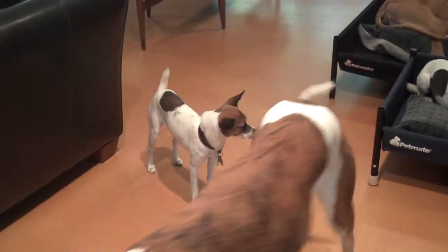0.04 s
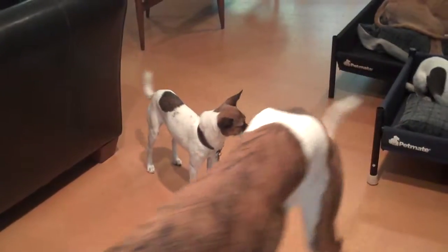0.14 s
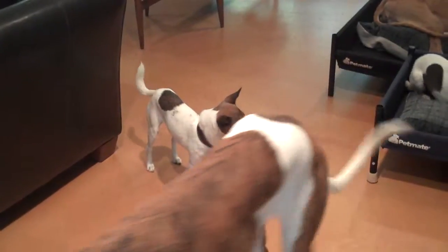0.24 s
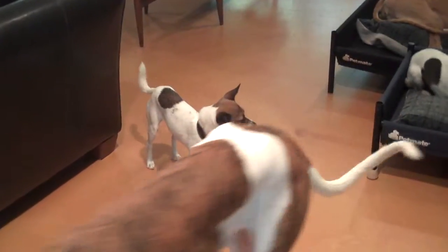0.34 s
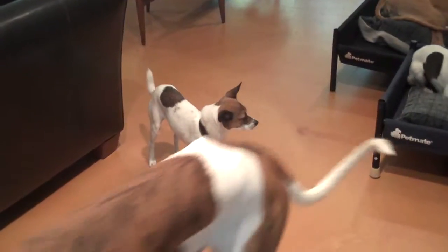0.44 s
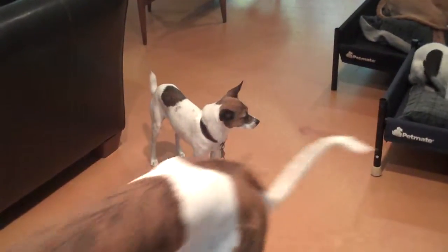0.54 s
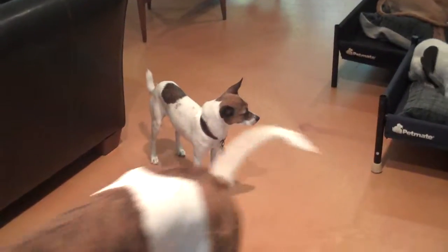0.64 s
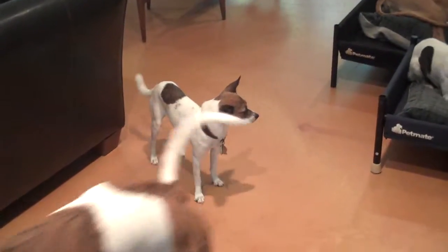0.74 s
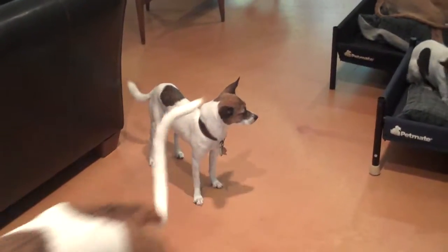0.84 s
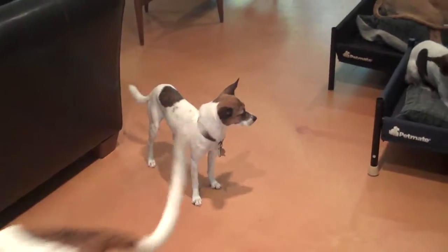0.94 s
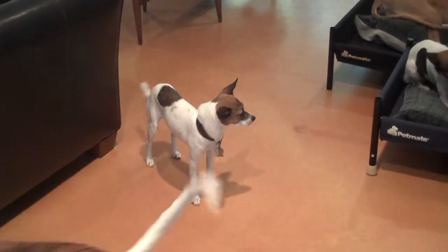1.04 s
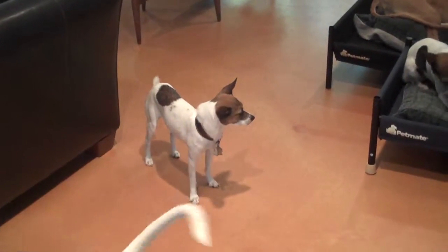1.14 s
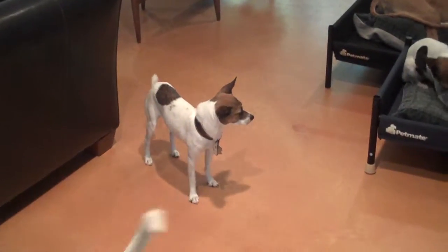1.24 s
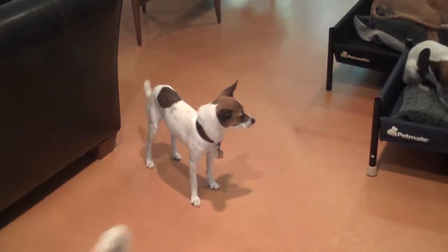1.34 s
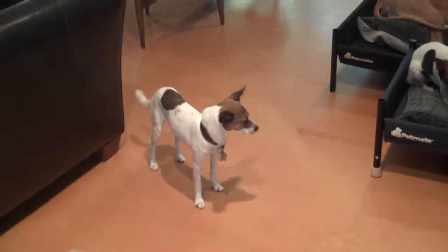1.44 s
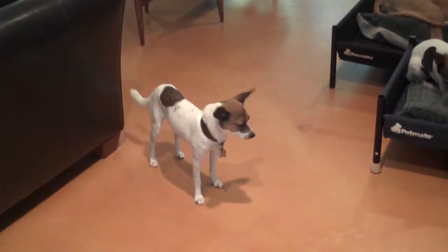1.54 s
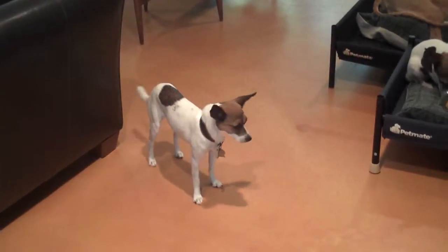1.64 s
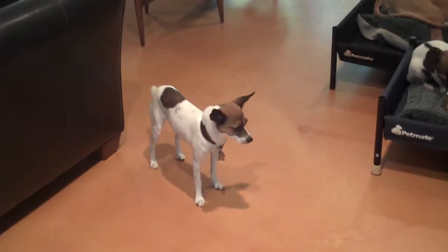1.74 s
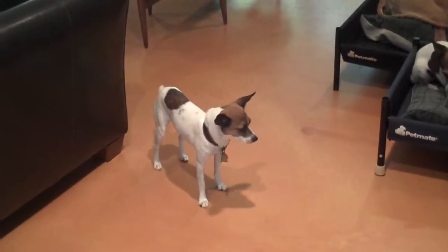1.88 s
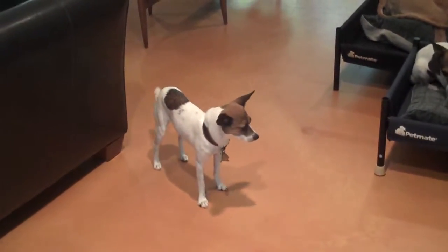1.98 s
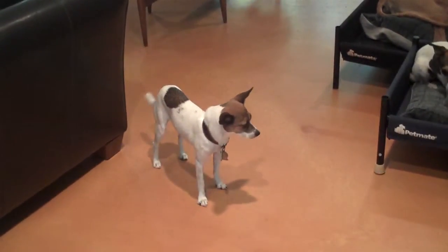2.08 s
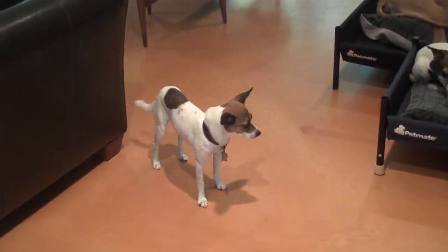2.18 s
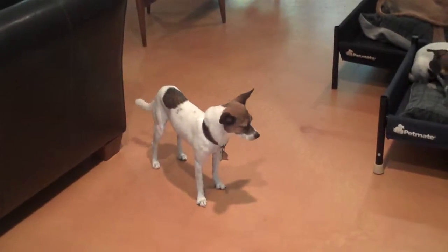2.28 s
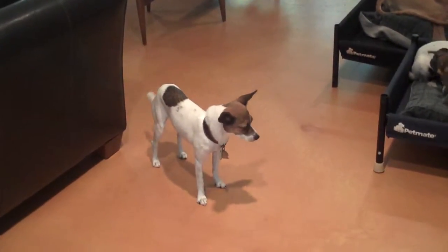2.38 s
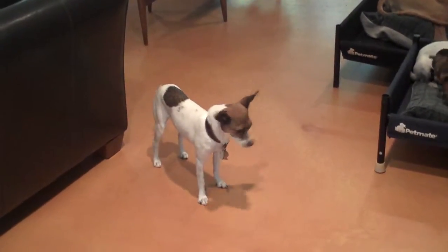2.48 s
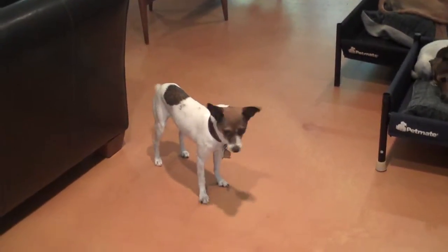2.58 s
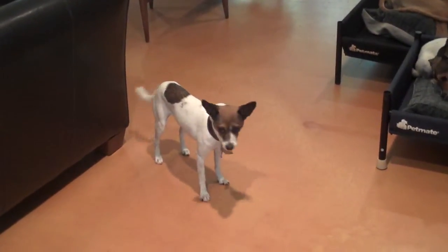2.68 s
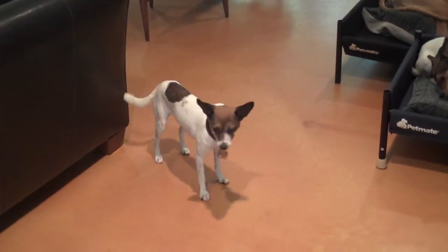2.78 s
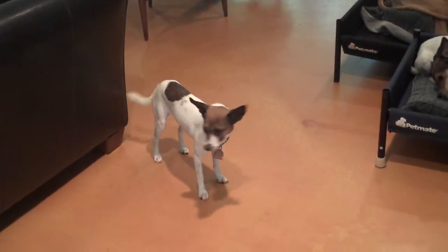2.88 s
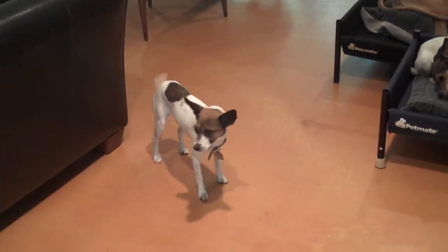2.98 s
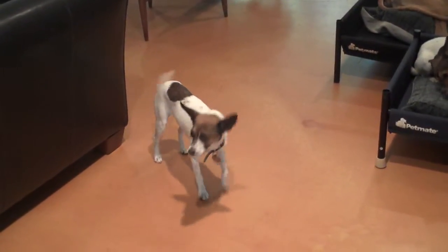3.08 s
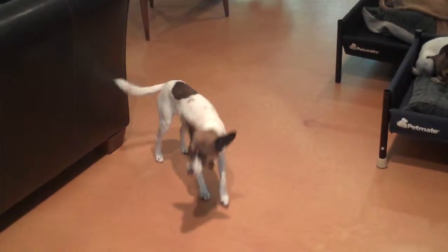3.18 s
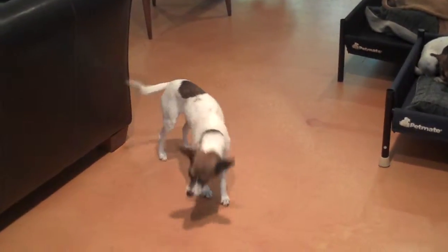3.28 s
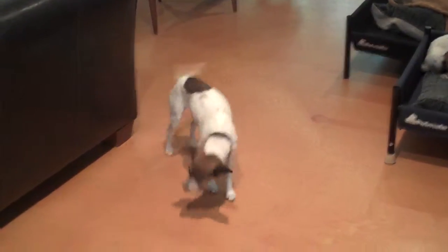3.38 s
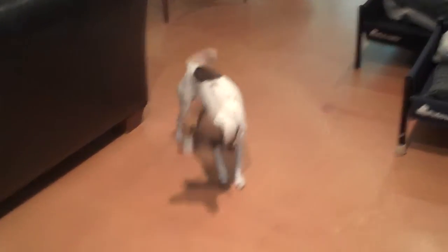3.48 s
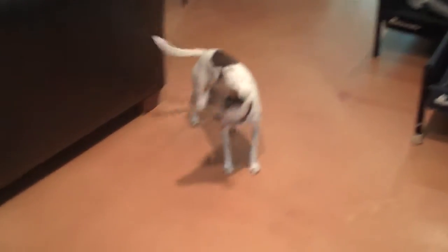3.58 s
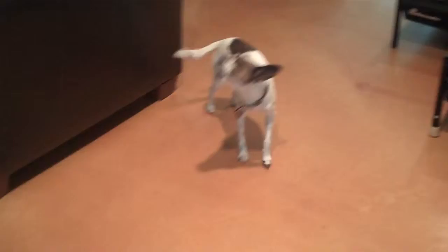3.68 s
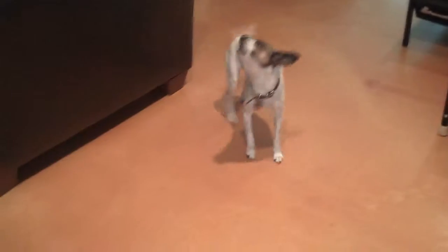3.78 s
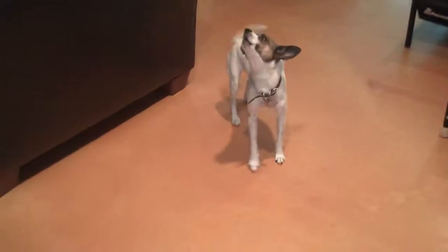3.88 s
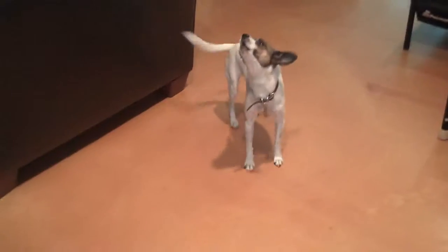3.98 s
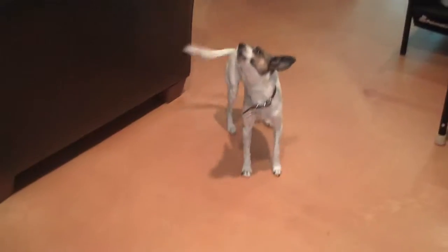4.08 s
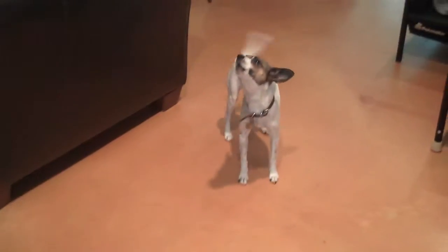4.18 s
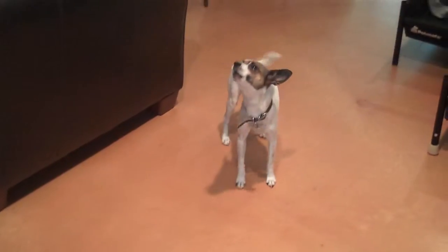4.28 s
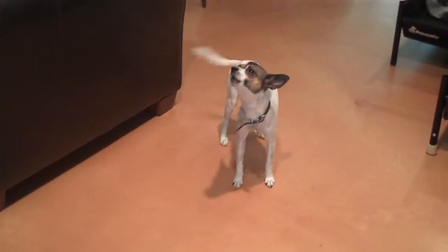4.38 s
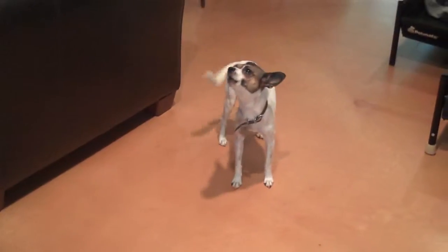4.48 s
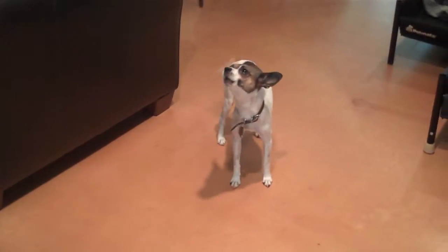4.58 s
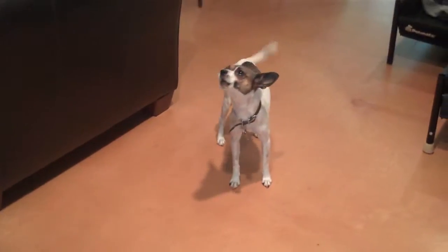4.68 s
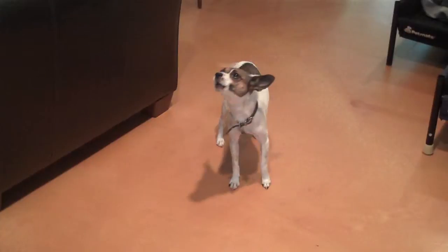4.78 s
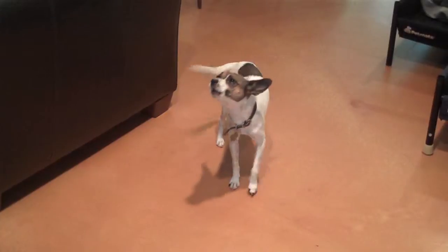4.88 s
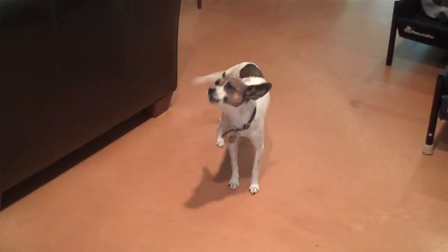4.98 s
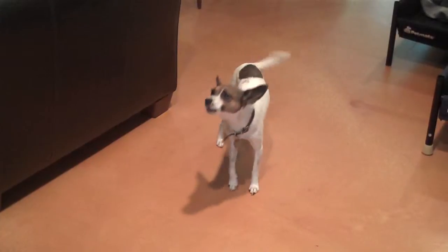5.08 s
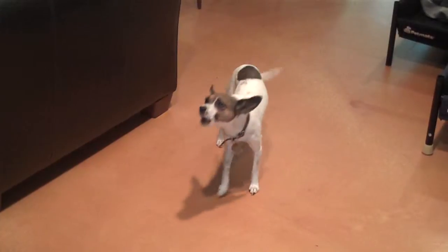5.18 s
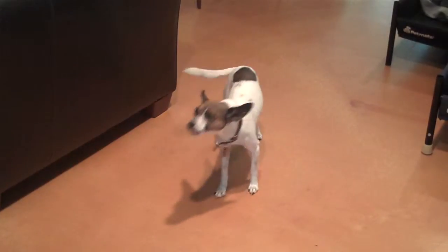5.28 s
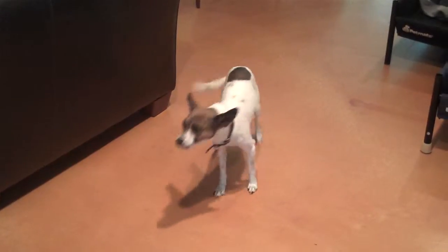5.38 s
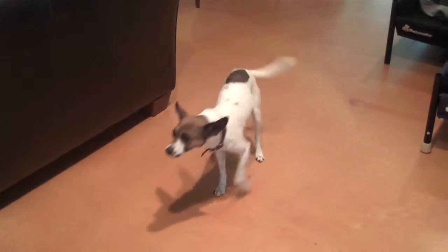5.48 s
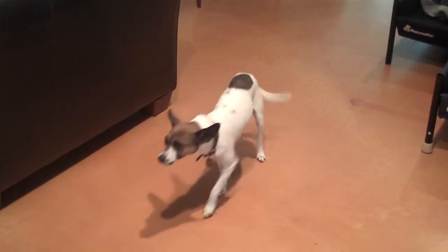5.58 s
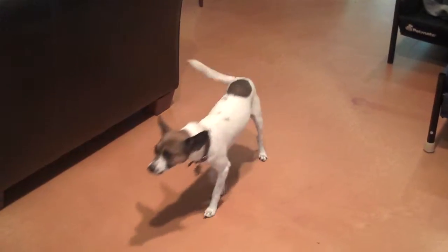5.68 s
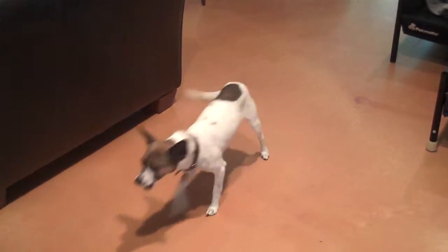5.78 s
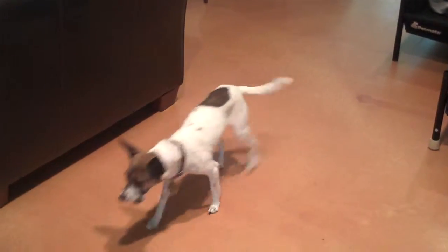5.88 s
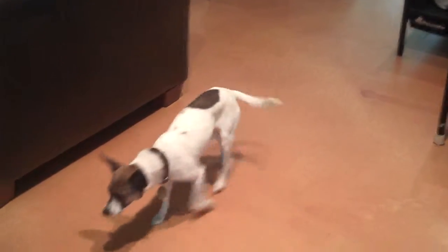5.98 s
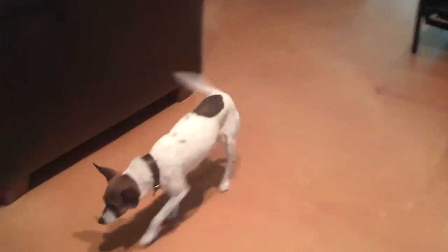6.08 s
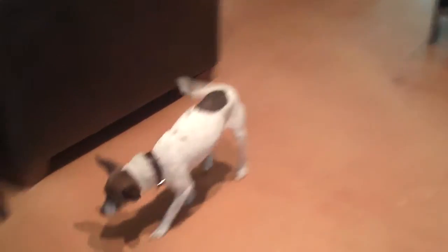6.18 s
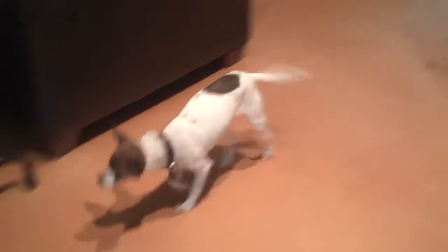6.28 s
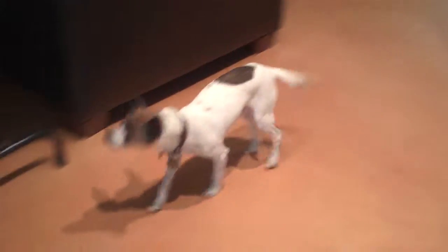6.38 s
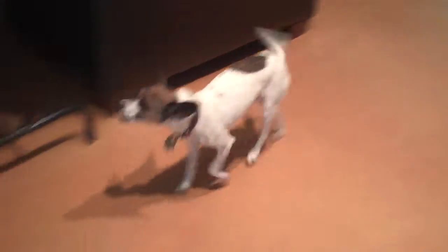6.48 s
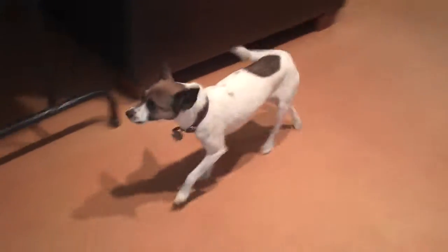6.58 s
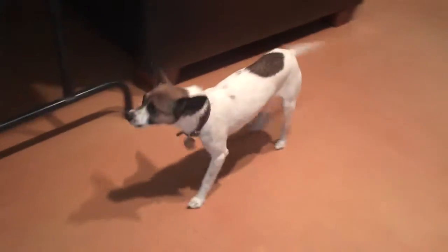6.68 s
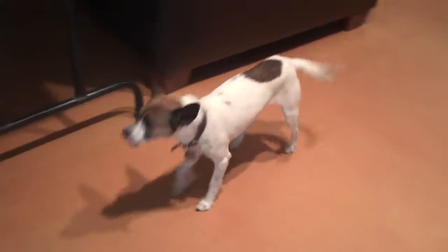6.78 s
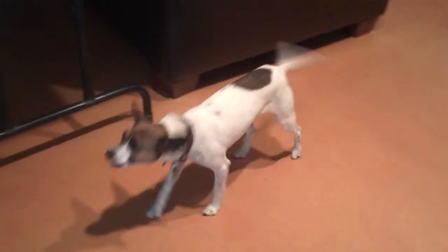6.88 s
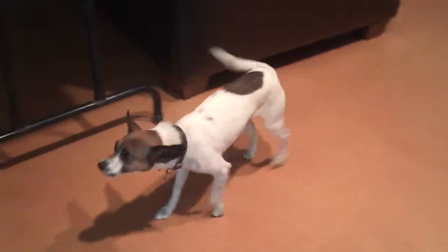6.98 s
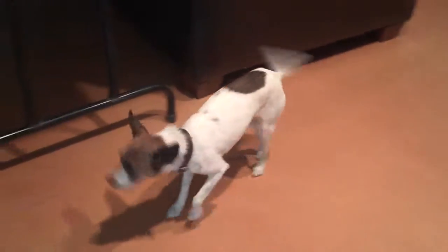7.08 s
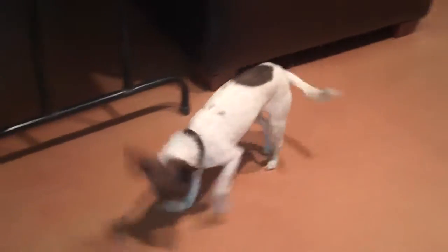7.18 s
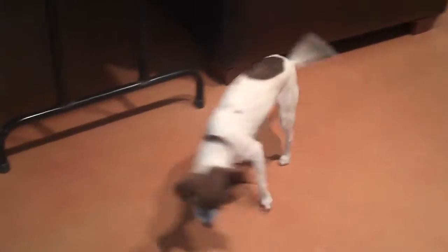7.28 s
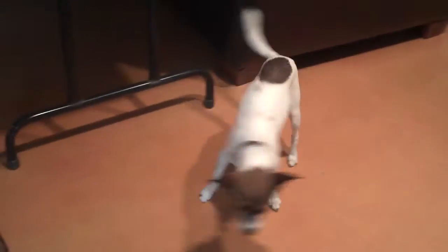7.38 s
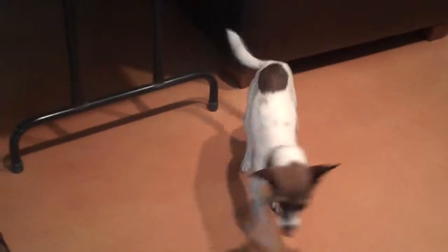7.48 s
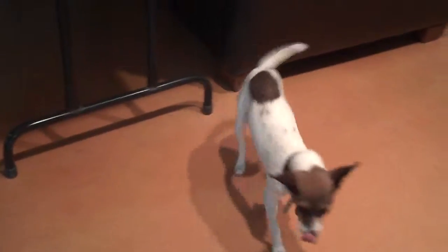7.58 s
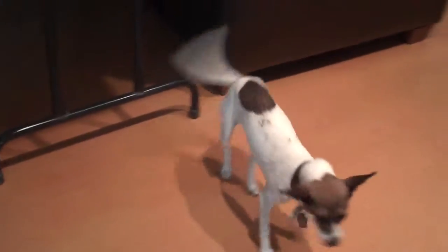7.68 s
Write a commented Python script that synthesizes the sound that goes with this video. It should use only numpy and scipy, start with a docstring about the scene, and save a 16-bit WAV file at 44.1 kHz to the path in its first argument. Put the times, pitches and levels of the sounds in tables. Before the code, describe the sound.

A hard-floored, echoing room with low airy room tone. From 0 to 2.6 seconds, soft hollow paw thumps and dry claw ticks come irregularly, the sharpest claw click near 1.55, with thin bright collar-tag clinks among them. Tags jingle more densely from about 2.8 to 3.65. At 3.68 a small dog gives a very loud, rough, short yip, falling slightly in pitch and distorting the microphone. It runs straight into a much softer, clear high whine, almost a pure whistle, held until 5.4; it sinks slowly, then cracks into a quick upward flick around 5.25 and drops. Tags keep clinking, with a knock near 4.7 and footfalls around 5.3 to 5.5. At 6.45 a second loud yip jumps upward for a tenth of a second. A faint, low closed-mouth groan sinks from 7.0 to 7.27, followed by a grainy paw scuff at 7.3 and last tag jingles.

```python
"""Paws thump, claws tick and collar tags jingle in a hard, echoing room; then a small dog yips, holds a long
clear whine that flicks up at its end, yips again and groans softly; a late scuff follows.
Voices are phase-summed partials plus breath noise; tags are ringing modes under a noise tick.
Feet are decaying noise bands; room tone lies below. The yips clip the recorder and pull its gain down."""
import sys
import numpy as np
from scipy import signal
from scipy.fft import rfft, irfft, next_fast_len
from scipy.io import wavfile
from scipy.ndimage import uniform_filter1d, map_coordinates

SR = 44100
rng = np.random.default_rng(int(sys.argv[2]) if len(sys.argv) > 2 else 0)


def field_ratio(decibels):
    """Amplitude ratio for a level in dB (20 dB per decade); scalars and array-likes work."""
    return 10 ** (np.asarray(decibels, dtype=float) / 20)


def unload_wav(signal):
    """Save mono or channel-first audio to the path in sys.argv[1] as 16-bit WAV at rate SR, clipped to [-1, 1]."""
    wavfile.write(
        sys.argv[1],
        SR,
        np.round(np.clip(np.atleast_2d(signal).T, -1, 1) * 32767).astype(np.int16),
    )


N = 341319


def unit(x):
    """Scale to rms 1."""
    return x / np.sqrt(np.mean(x ** 2) + 1e-20)


def along(points, hz):
    """Interpolate (frequency [Hz], value) points on a log axis."""
    f, v = np.transpose(points)
    return np.interp(np.log(hz + 1), np.log(f + 1), v)


def span(rows):
    """First sample, 4 ms end fades and per-sample columns of a curve."""
    s, *cols = np.transpose(rows)
    t = np.arange(s[0], s[-1], 1 / SR)
    fade = np.clip(np.minimum(t - s[0], s[-1] - t) * 250, 0, 1)
    return round(s[0] * SR), fade, [np.interp(t, s, c) for c in cols]


def add(x, start, piece):
    """Mix a piece in at a sample."""
    x[start:start + len(piece)] += piece[:N - start]


def wobble(n, rate_hz):
    """Smooth random curve, rate_hz knots a second."""
    knots = rng.standard_normal(int(n * rate_hz / SR) + 4)
    return map_coordinates(knots, [np.arange(n) * rate_hz / SR])


def noise(n, spectrum):
    """Coloured noise of about rms 1."""
    m = next_fast_len(n + 8192)
    gain = field_ratio(along(spectrum, np.fft.rfftfreq(m, 1 / SR)))
    return unit(irfft(rfft(rng.standard_normal(m)) * gain, m)[:n])


def band(x, lo_hz, hi_hz):
    """Causal band-pass."""
    return signal.sosfilt(signal.butter(2, [lo_hz, min(hi_hz, SR * .45)], "band", fs=SR, output="sos"), x)


# soft voice's overtones above the octave, by where they fall: (frequency [Hz], level [dB])
THROAT = [(2200, -66), (2800, -61.5), (3350, -66.5), (3650, -91.5), (4150, -75), (5500, -85.5), (8000, -69)]
# breath noise colour: (frequency [Hz], relative density [dB per Hz])
BREATH = [(300, -43), (600, -2.5), (1100, 4), (1800, -9.5), (2500, -22.5), (6000, -28.5), (9000, -19.5),
          (13000, -28.5)]


def voice(calls, octave_over, jitter, breath_db):
    """Vocal folds in a high register: a near-sine with weak overtones; effort adds rasp and breath."""
    out = np.zeros(N)
    for rows in calls:
        start, fade, (hz, first_db) = span(rows)
        n = len(hz)
        effort = np.clip((first_db + 13) / 16, 0, 1)
        # fast pitch leaps unsettle the folds
        glide = uniform_filter1d(np.abs(np.gradient(hz)) * SR / 2500, size=1200)
        rough = np.clip(effort + glide, 0, 1)
        phase = 2 * np.pi * np.cumsum(hz * (1 + jitter * wobble(n, 40))) / SR

        def rasp(k):
            """Uneven cycles smear the higher partials most."""
            return 1 + rough * np.minimum(.05 * k * k, 2) * wobble(n, 500)

        upper = 0
        for k in range(3, 9):
            level_db = along(THROAT, k * hz) + 19 * effort + 5 * np.minimum(glide, 1) + 5 * wobble(n, 15)
            smear = .6 * k * rough * wobble(n, 250)
            upper = upper + field_ratio(level_db) * rasp(k) * np.sin(k * phase + smear)
        octave_db = first_db + along(octave_over, hz) + 1.2 * wobble(n, 25)
        octave = field_ratio(octave_db) * rasp(2) * np.sin(2 * phase + 1 + .6 * glide * wobble(n, 250))
        first = field_ratio(first_db) * rasp(1) * np.sin(phase)
        tone = np.sqrt(2) * (first + octave + upper)
        breath = field_ratio(first_db + breath_db + 7.6 * rough) * noise(n, BREATH)
        add(out, start, fade * (tone + breath))
    return out


# one list per yip: (time [s], pitch [Hz], fundamental level [dB])
YIPS = [
    [(3.68, 870, -22), (3.692, 850, 0), (3.71, 815, 3), (3.747, 792, 4.5), (3.753, 785, -1),
     (3.775, 778, -13)],
    [(6.45, 645, -48), (6.48, 690.5, -3.5), (6.492, 708.3, -3.5), (6.507, 768.7, 0), (6.52, 784.3, 4),
     (6.53, 810, 0), (6.545, 886, -13.5)],
]
# octave over the fundamental, by pitch: (pitch [Hz], level [dB])
YIP_OCTAVE = [(680, -14), (755, -1.5), (785, -18.5), (820, -17.5), (865, -7)]


def yips_and_breaks():
    """Two forced calls, pitch unsteady, plus all voice breaks, including the one in the whine's final flick."""
    return voice(YIPS, YIP_OCTAVE, jitter=0.014, breath_db=-27.5) + breaks()


# second tone gliding beside the pitch:
# (start [s], length [s], first frequency [Hz], last frequency [Hz], peak level [dB])
BREAKS = [(3.67, 0.037, 826.5, 1090, -5), (5.245, 0.069, 1336, 1446, -23), (6.466, 0.045, 854, 887, -9.5),
          (6.521, 0.0948, 1218, 925, -5)]


def breaks():
    """Short, rough gliding tones where the voice cracks."""
    out = np.zeros(N)
    for s, length_s, first_hz, last_hz, db in BREAKS:
        n = round(length_s * SR)
        phase = 2 * np.pi * np.cumsum(np.linspace(first_hz, last_hz, n)) / SR
        add(out, round(s * SR), field_ratio(db) * np.hanning(n) * np.sin(phase + 1.2 * wobble(n, 300)))
    return out


# (time [s], pitch [Hz], fundamental level [dB])
WHINE = [(3.78, 918, -21), (3.95, 922.4, -27.5), (4.12, 912.8, -26), (4.24, 911.3, -25),
         (4.5, 925.5, -31.5), (4.64, 881, -25.5), (4.76, 861.5, -27), (4.86, 807.7, -21.5),
         (4.96, 846.4, -17), (5.05, 794.5, -20.5), (5.17, 746, -23), (5.215, 786, -9), (5.245, 965, -15.5),
         (5.265, 1018, -7), (5.31, 1125, -19), (5.375, 892, -15.5), (5.41, 860, -37.5)]
# octave over the fundamental, by pitch: (pitch [Hz], level [dB])
WHINE_OCTAVE = [(760, -44.5), (835, -24), (870, -28.5), (920, -24.5), (1050, -26)]


def whine():
    """A long, soft call on a steadier pitch than the yips."""
    return voice([WHINE], WHINE_OCTAVE, jitter=.003, breath_db=-39.5)


# brief fades where room echoes cancel the whine: (time [s], gain [dB])
ECHO_FADES = [(4.197, -13.5), (4.41, -19), (4.59, -21)]
ECHO_FADE_S = 0.011  # half width


def echo_fades():
    """Gain curve for echo cancellation: 1 except for brief bell-shaped (in dB) fades."""
    t = np.arange(N) / SR
    return field_ratio(sum(db * np.exp(-((t - s) / ECHO_FADE_S) ** 2) for s, db in ECHO_FADES))


# (time [s], pitch [Hz], level [dB])
GROAN = [(6.98, 242.6, -56), (7.04, 258, -47), (7.105, 249.1, -49.5), (7.15, 234.6, -54),
         (7.19, 197, -56.5), (7.27, 191.5, -54.5)]
# closed-mouth gain on the overtones: (frequency [Hz], gain [dB])
GROAN_THROAT = [(190, -10), (260, -8.5), (480, 6), (800, -1.5), (1000, 0.5), (1300, -12), (2000, -19.5)]


def groan():
    """A soft low groan through a closed mouth: an unsteady stack of overtones whose pitch sinks."""
    out = np.zeros(N)
    start, fade, (hz, db) = span(GROAN)
    n = len(hz)
    phase = 2 * np.pi * np.cumsum(hz * (1 + .05 * wobble(n, 60))) / SR
    stack = 0
    for k in range(1, 9):
        gain = field_ratio(along(GROAN_THROAT, k * hz) + 4 * wobble(n, 60))
        stack = stack + gain * np.sin(k * phase + 2 * wobble(n, 70))
    add(out, start, np.sqrt(2) * fade * field_ratio(db) * stack)
    return out


# modes of three collar tags, by tag: (frequency [Hz], level re ring [dB], t60 [s])
TAG_MODES = {"big": [(5140, -3, 0.44), (5300, -11, 0.25), (10200, -6.5, 0.4), (10650, -7.5, 0.35),
             (11400, -8.5, 0.25)], "small": [(6090, 0.5, .2), (6860, 3, 0.26), (7900, -25, 0.25),
             (12570, -3, .25)], "thin": [(7490, -13.5, 0.49), (13000, -1.5, 0.19), (13150, -14.5, 0.69)]}
# phase blur by swinging, by tag: scale at 4500 Hz [rad]
TAG_SWING = {"big": 1.5, "small": .6, "thin": .9}
# strikes: (time [s], tag, tick level [dB], ring level [dB])
JINGLES = [(0.174, "thin", -35.5, -52), (0.4207, "big", -38, -56), (0.6583, "big", -30.5, -50),
           (0.861, "thin", -40, -54), (1.852, "thin", -39, -52), (1.9348, "big", -30, -52),
           (2.3215, "big", -26, -48.5), (2.6346, "small", -48, -67), (2.6916, "thin", -51, -49.5),
           (2.789, "big", -42.5, -58), (2.884, "small", -85, -70), (3.191, "big", -38, -44),
           (3.2128, "big", -29, -49), (3.4564, "small", -47, -60), (3.5652, "big", -33.5, -42),
           (3.613, "small", -32.5, -54), (3.651, "small", -25, -55), (4.071, "small", -41, -48.5),
           (4.1088, "big", -27.5, -52.5), (4.2438, "small", -32.5, -51.5), (4.4548, "big", -25.5, -46),
           (4.8767, "big", -25.5, -54), (4.9106, "small", -50, -55.5), (5.338, "big", -18, -50.5),
           (5.494, "big", -25.5, -69), (5.5155, "small", -26, -52), (5.625, "big", -31, -51),
           (5.8362, "big", -24.5, -50.5), (6.141, "small", -47.5, -58.5), (6.2872, "small", -36, -56.5),
           (6.4455, "small", -41.5, -38.5), (6.8768, "small", -74, -51), (6.9654, "small", -39, -49.5),
           (7.311, "big", -45, -42.5), (7.578, "small", -66, -56), (7.6351, "small", -30, -41)]


def tags():
    """A tick and a short rattle of metal on metal; the tag rings, its modes blurred as it swings and touches."""
    out, t = np.zeros(N), np.arange(SR // 3) / SR
    n = len(t)
    for s, tag, tick_db, ring_db in JINGLES:
        tick = field_ratio(-14.5 - 60 * t / 0.0079)
        rattle = field_ratio(-12 + 3 * wobble(n, 120) - 60 * t / 0.12)
        treble = band(band(rng.standard_normal(n), 5000, 16000), 5000, 16000)
        hit = field_ratio(tick_db) * (tick + rattle) * treble
        for hz, mode_db, t60_s in TAG_MODES[tag]:
            blur = TAG_SWING[tag] * (hz / 4500) * wobble(n, 90)
            level_db = ring_db + mode_db + rng.normal(0, 3) + 4 * wobble(n, 40) - 60 * t / t60_s
            hit = hit + field_ratio(level_db) * np.sin(2 * np.pi * hz * t + blur)
        add(out, round(s * SR), hit * (1 - np.exp(-t / .0015)))
    return out


# (time [s], level [dB], knock re level [dB])
CLAWS = [(0.0887, -38, -26), (0.1128, -49.5, 14.5), (0.514, -40, -33), (0.756, -53, 14.5),
         (0.977, -43, -20), (1.282, -40, -6), (1.3156, -43, -17), (1.4258, -38, -7.5),
         (1.493, -39.5, -10.5), (1.56, -23.5, -8), (1.746, -42, -6.5), (2.2422, -46.5, -11.5),
         (2.5585, -45.5, -7), (6.083, -53.5, 14), (6.255, -52.5, 8.5)]
# what a claw's blow rings with: (frequency [Hz], relative level [dB])
FLOOR = [(1410, -15.5), (2680, -3), (3150, -9), (4550, -13)]
KNOCK_HZ, KNOCK_HZ_PER_DB = 2000, -72  # the heavier the knock, the duller it and its crack
STRAY_CLAWS, STRAY_MAX_DB = 20, -45  # faint ticks at random moments


def claws():
    """A dry crack in the treble and a brief ring over the short knock; a heavier knock lasts longer."""
    out, t = np.zeros(N), np.arange(SR // 5) / SR
    n = len(t)
    stray = [(u * N / SR, STRAY_MAX_DB - 8 * v, -20 * w) for u, v, w in rng.random((STRAY_CLAWS, 3))]
    for s, db, knock_db in CLAWS + stray:
        hz = np.clip(KNOCK_HZ + KNOCK_HZ_PER_DB * knock_db, 500, 5000)
        crack = field_ratio(-0.5 - 60 * t / 0.034) * band(rng.standard_normal(n), hz, 3 * hz)
        knock_t60_s = 0.15 * field_ratio(knock_db / 2)
        knock = field_ratio(knock_db + 4.5 - 60 * t / knock_t60_s) * band(rng.standard_normal(n), 0.69 * hz, 2.31 * hz)
        ring = 0
        for mode_hz, mode_db in FLOOR:
            level_db = mode_db + rng.normal(0, 2) + min(knock_db, 0) / 2 - 60 * t / .05
            ring = ring + field_ratio(level_db) * np.sin(2 * np.pi * mode_hz * t)
        add(out, round(s * SR), field_ratio(db) * (crack + knock + ring))
    return out


# paws and knocks: (time [s], level [dB], note frequency [Hz])
THUMPS = [(0.051, -41.5, 434), (0.115, -36, 320), (0.377, -49.5, 338), (0.656, -39.5, 690),
          (0.734, -44.5, 320), (1.141, -40, 330), (1.24, -42.5, 363), (1.283, -33, 597),
          (1.316, -46.5, 735), (1.518, -44, 328), (1.648, -42.5, 344), (2.075, -49, 330),
          (4.715, -31, 1180), (5.341, -41.5, 348), (5.482, -32, 555), (6.277, -45, 276)]


def thumps():
    """Soft pads: a dull, hollow note that dies within some tens of cycles, with a puff of noise."""
    out, t = np.zeros(N), np.arange(SR // 5) / SR
    n = len(t)
    for s, db, hz in THUMPS:
        note = unit(band(rng.standard_normal(n), 0.9 * hz, 1.123 * hz)) * field_ratio(2.0 - 60 * t * hz / 55)
        puff = field_ratio(5 - 60 * t / .07) * band(rng.standard_normal(n), 400, 1300)
        add(out, round(s * SR), field_ratio(db - 3) * (1 - np.exp(-t / .006)) * (note + puff))
    return out


# paws sliding: (start [s], rise [s], crest level [dB])
SCUFFS = [(.735, 0.02, -44), (7.239, 0.019, -41.5), (7.292, 0.029, -29.5)]
# scuff colour: (frequency [Hz], relative density [dB per Hz])
SCUFF_SPECTRUM = [(350, -17), (600, -6.5), (1180, -3.5), (2660, -6.5), (5140, -4.5), (5570, -5),
                  (12600, -18.5), (14000, -33)]
SCUFF_RISE_DB, SCUFF_FALL_S = 8, 0.24  # swell, time to fall 60 dB


def scuffs():
    """Pads and claws dragging: grainy noise that swells through each slide and stops."""
    out = np.zeros(N)
    for s, rise_s, crest_db in SCUFFS:
        crest_s = s + rise_s
        curve = [(s, crest_db - SCUFF_RISE_DB), (crest_s, crest_db), (crest_s + SCUFF_FALL_S, crest_db - 60)]
        start, fade, (db,) = span(curve)
        n = len(db)
        add(out, start, fade * field_ratio(db + 2.5 * wobble(n, 150)) * noise(n, SCUFF_SPECTRUM))
    return out


# room tone colour: (frequency [Hz], relative density [dB per Hz])
AIR_SPECTRUM = [(15, 16), (40, -11), (90, -11), (381, -1.5), (758, -8), (2400, -7), (5000, -12.5),
                (12100, -19), (14000, -28)]
# faint steady-pitched tone: (frequency [Hz], mean level [dB])
HUM = [(1637, -72.5)]
AIR_MEAN_DB = -57.5


def air():
    """Room tone as coloured noise, gently moving, with a faint tone."""
    t = np.arange(N) / SR
    hum = sum(field_ratio(db + 2.1 * wobble(N, 1.7)) * np.sin(2 * np.pi * hz * t) for hz, db in HUM)
    return field_ratio(AIR_MEAN_DB + wobble(N, 3) + wobble(N, 45)) * noise(N, AIR_SPECTRUM) + hum


# reverberation: (frequency [Hz], t60 [s])
ROOM_T60 = [(200, 0.81), (800, 0.62), (1600, 0.76), (2300, 0.66), (5500, 0.48), (13000, 0.36)]


def room(x, wet_db):
    """Hard floor and walls: decay by frequency; the echo pattern changes as the dogs move."""
    out, step = x.copy(), SR // 3
    for start in range(0, N, step):
        hz, t, z = signal.stft(rng.standard_normal(SR), SR, nperseg=256)
        tail = signal.istft(z * field_ratio(-60 * t / along(ROOM_T60, hz)[:, None]), SR, nperseg=256)[1]
        tail = tail * (1 - np.exp(-np.arange(len(tail)) / (.025 * SR)))  # echoes thicken at first
        piece = x[start:start + 2 * step] * np.hanning(2 * step)[:N - start]
        add(out, start, field_ratio(wet_db) * signal.fftconvolve(piece, tail / np.linalg.norm(tail)))
    return out


def scene():
    """All but the air sounds in one room, each source with its own share of echo."""
    calls = room(yips_and_breaks(), wet_db=-9.5) + room(whine(), wet_db=-6.5) * echo_fades()
    calls = calls + room(groan(), wet_db=-4)
    feet = room(claws(), wet_db=-4.0) + room(thumps(), wet_db=-3.5) + room(scuffs(), wet_db=-7.0)
    return (calls + room(tags(), wet_db=-0.5) + feet + air())[None]


def band_limit(x):
    """A steep low-pass at the top of the band."""
    return signal.sosfilt(signal.butter(12, 15640, fs=SR, output="sos"), x)


def record(dry):
    """The microphone cuts off the top treble; gain ducks after loud sounds and creeps back; peaks clip."""
    heard = signal.sosfilt(signal.cheby2(12, 40, 14300, fs=SR, output="sos"), dry)
    keep = np.exp(-1 / (.18 * SR))  # 0.18 s power average
    loud_db = 10 * np.log10(signal.lfilter([1 - keep], [1, -keep], heard ** 2) + 1e-12)
    heard = heard * field_ratio(-.22 * np.maximum(loud_db + 47, 0))
    clipped = heard / (1 + np.abs(heard / .7) ** 12) ** (1 / 12)
    return band_limit(clipped)


dry = scene()
out = record(dry)
unload_wav(out)
```